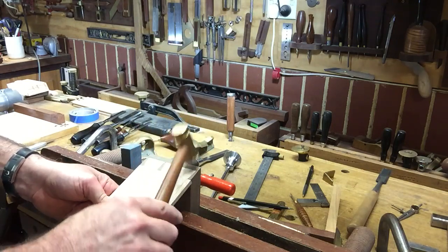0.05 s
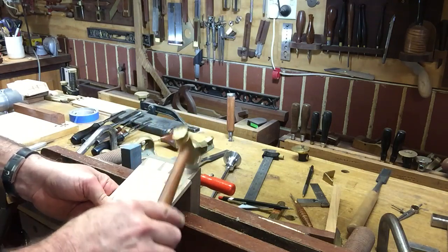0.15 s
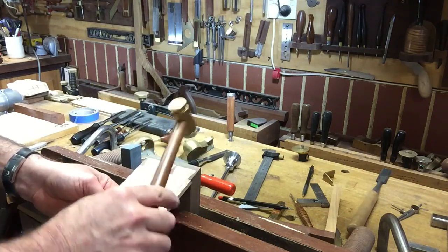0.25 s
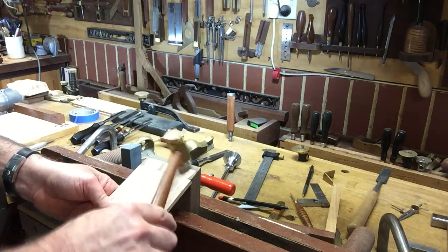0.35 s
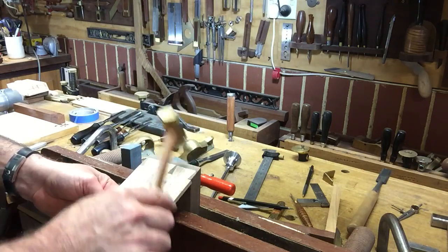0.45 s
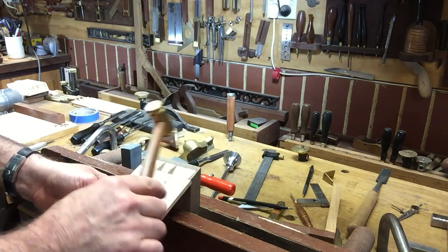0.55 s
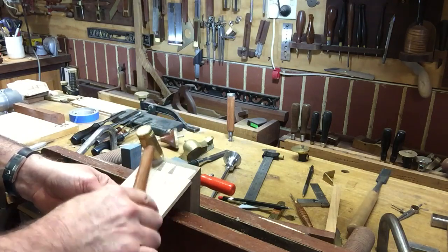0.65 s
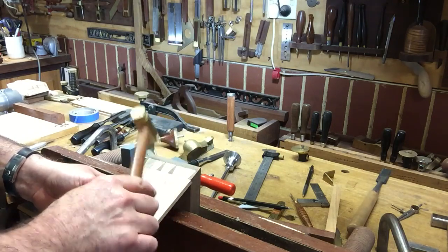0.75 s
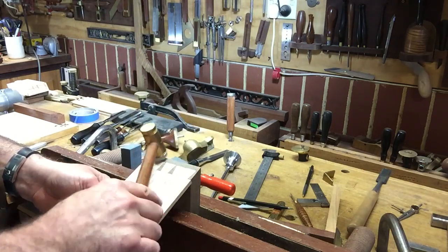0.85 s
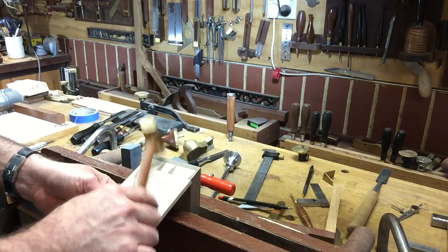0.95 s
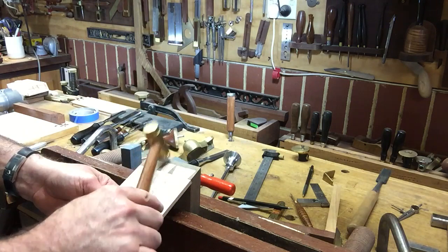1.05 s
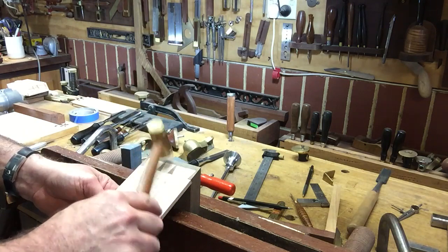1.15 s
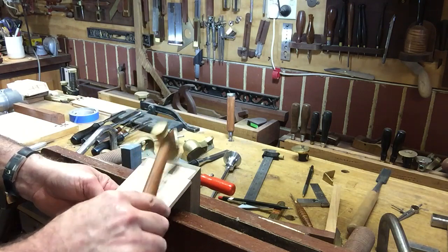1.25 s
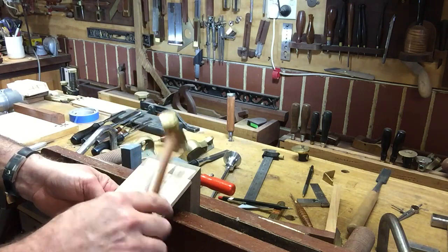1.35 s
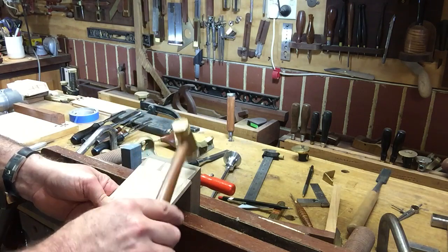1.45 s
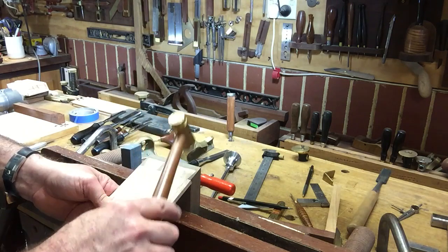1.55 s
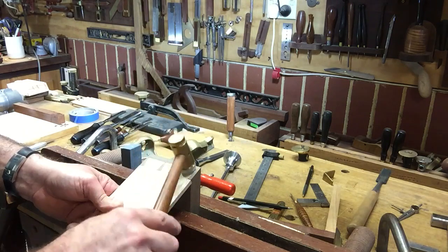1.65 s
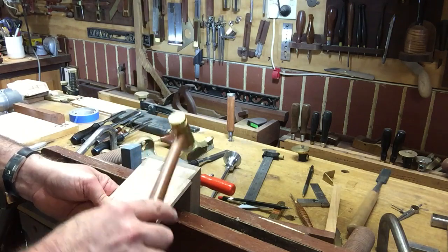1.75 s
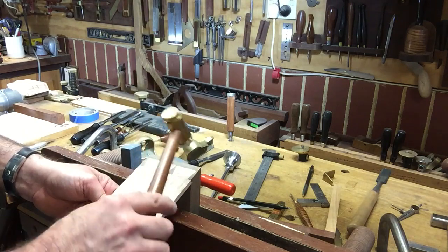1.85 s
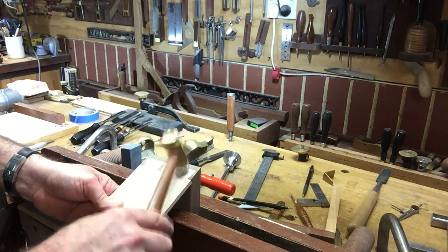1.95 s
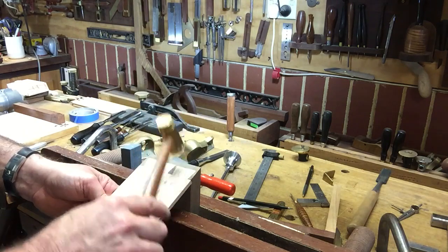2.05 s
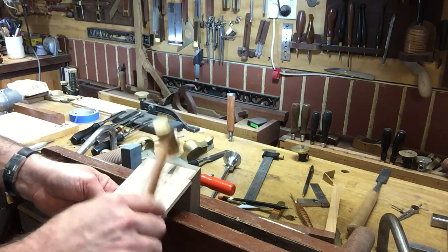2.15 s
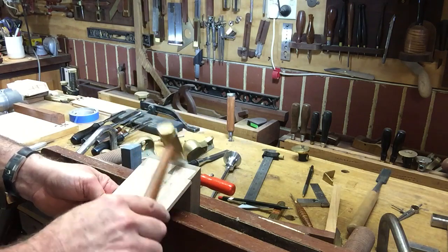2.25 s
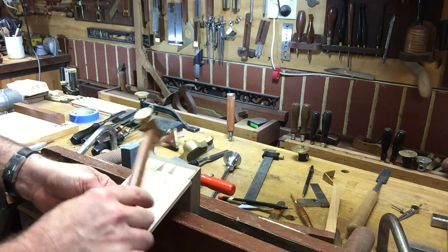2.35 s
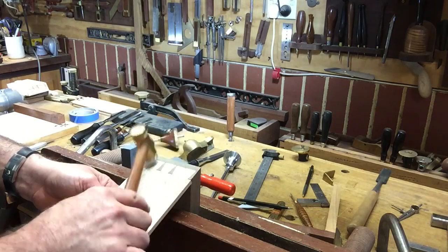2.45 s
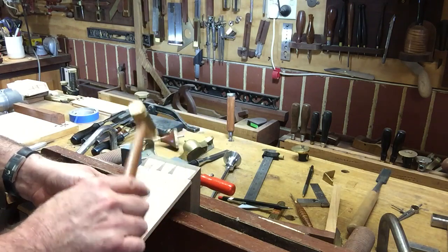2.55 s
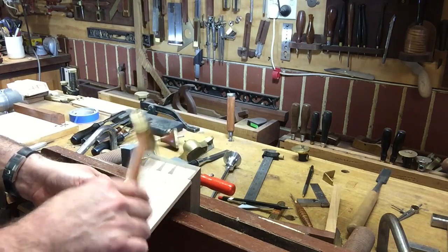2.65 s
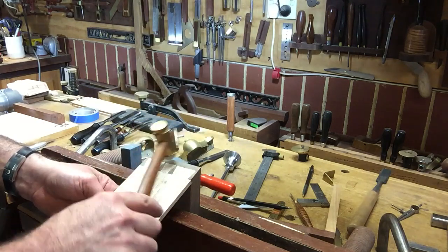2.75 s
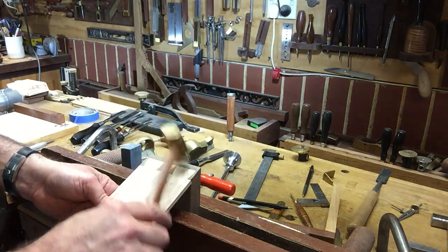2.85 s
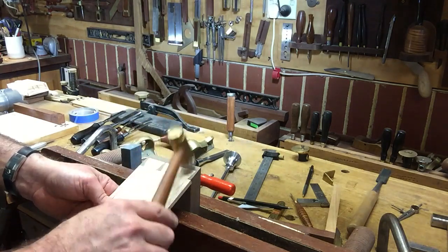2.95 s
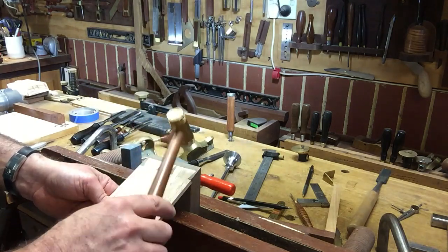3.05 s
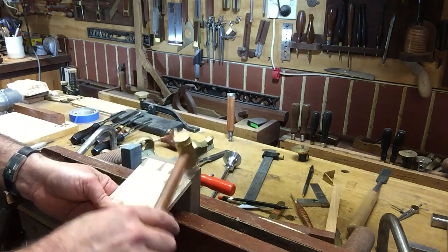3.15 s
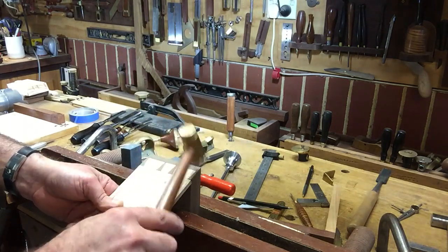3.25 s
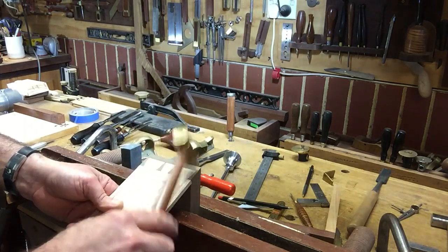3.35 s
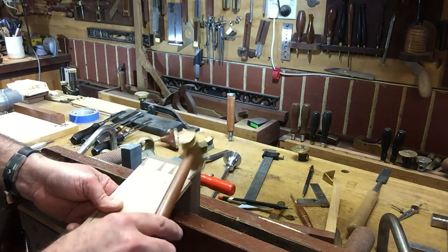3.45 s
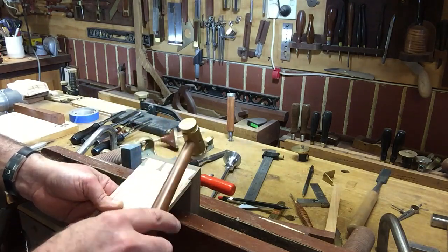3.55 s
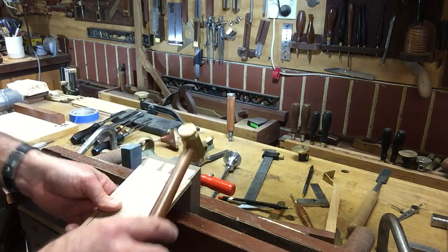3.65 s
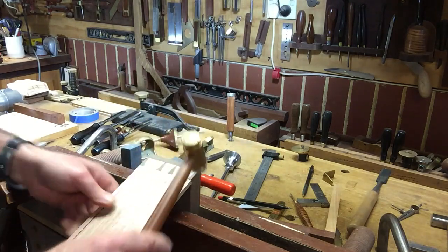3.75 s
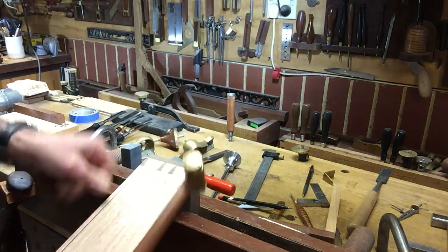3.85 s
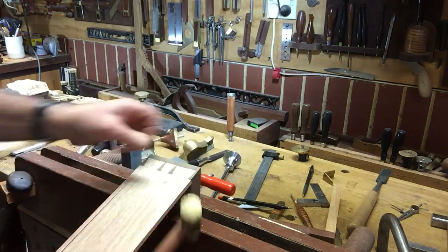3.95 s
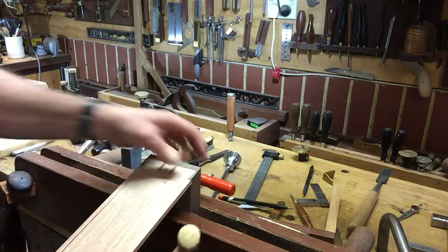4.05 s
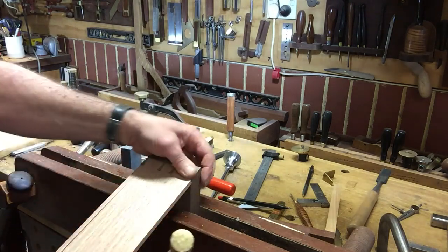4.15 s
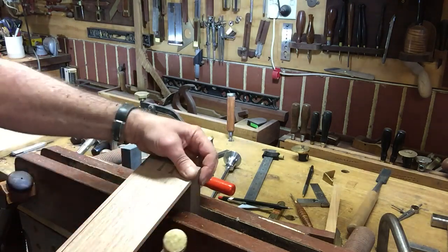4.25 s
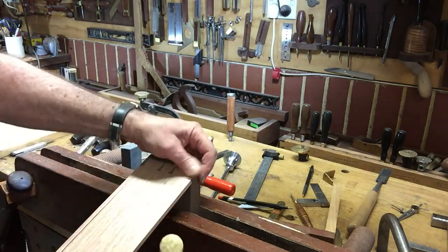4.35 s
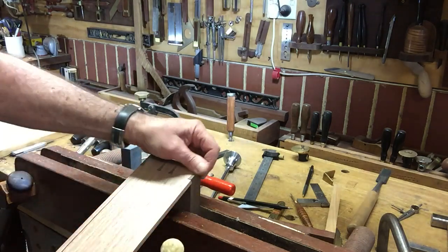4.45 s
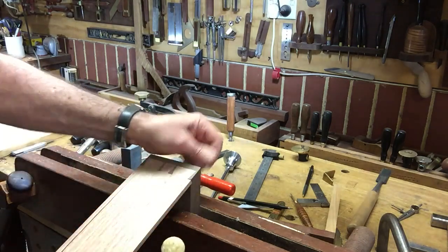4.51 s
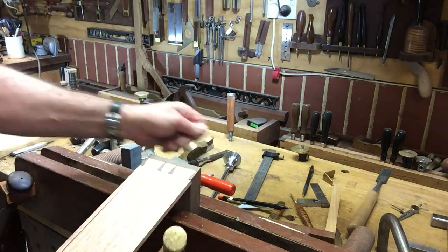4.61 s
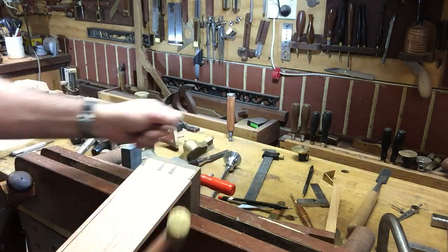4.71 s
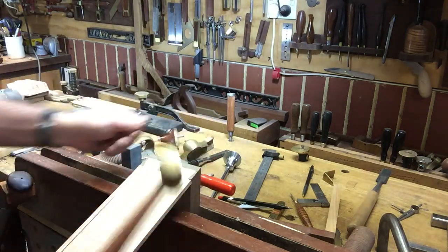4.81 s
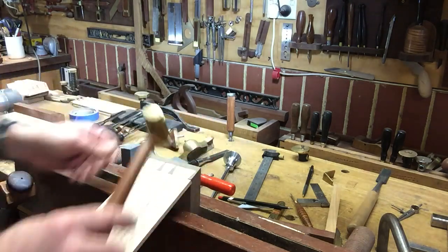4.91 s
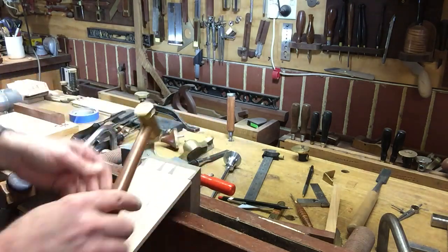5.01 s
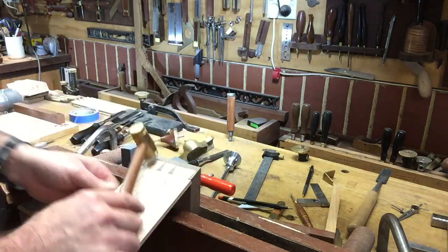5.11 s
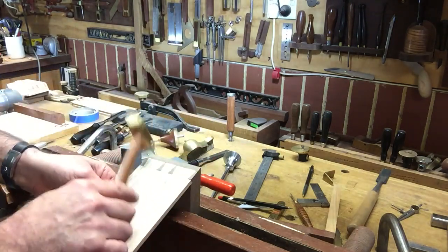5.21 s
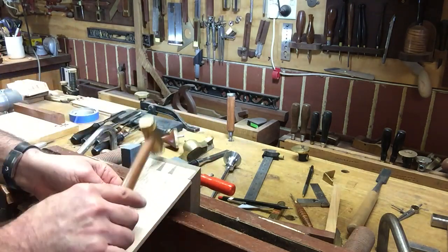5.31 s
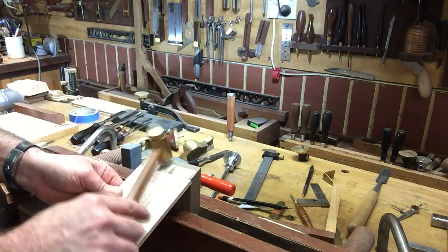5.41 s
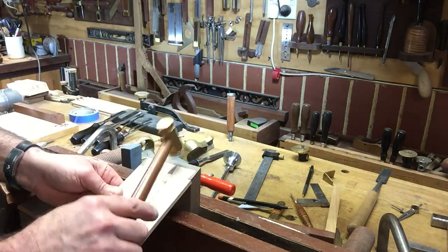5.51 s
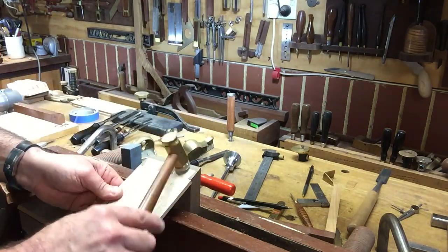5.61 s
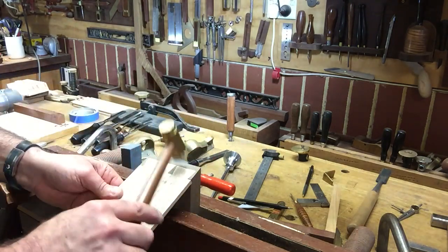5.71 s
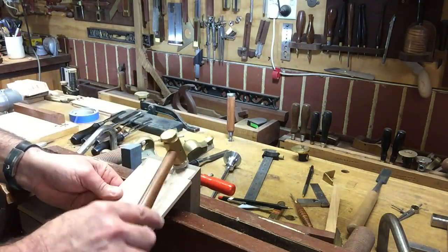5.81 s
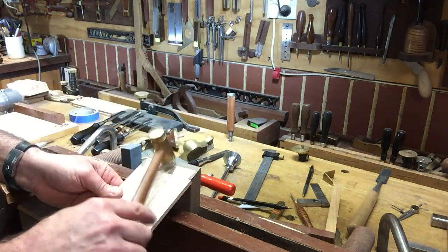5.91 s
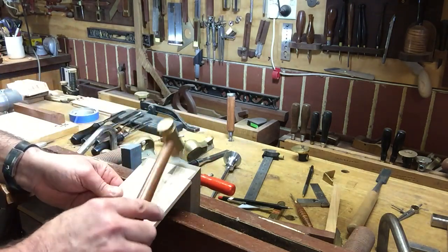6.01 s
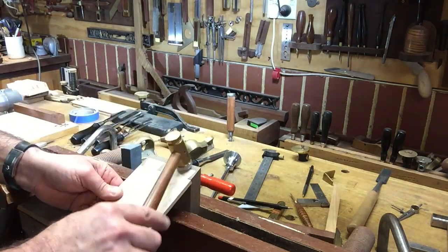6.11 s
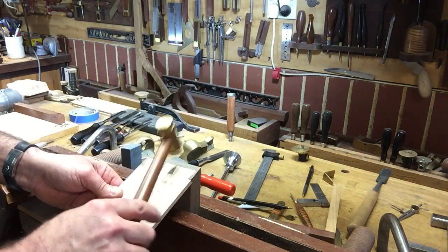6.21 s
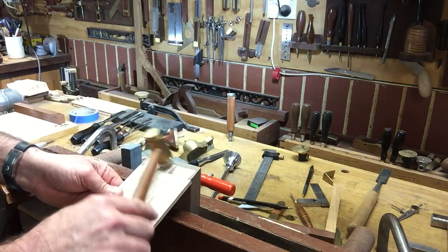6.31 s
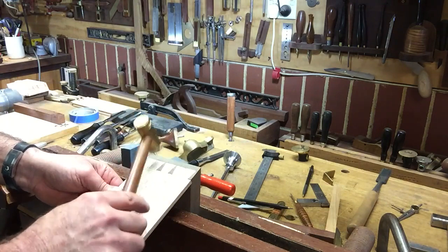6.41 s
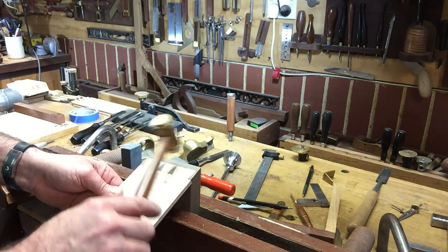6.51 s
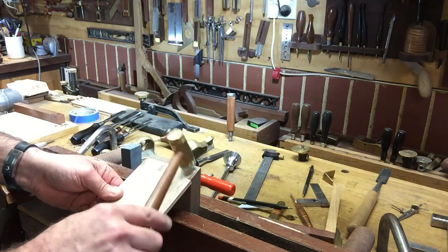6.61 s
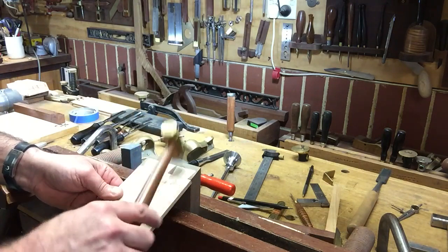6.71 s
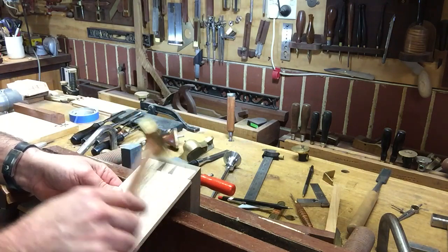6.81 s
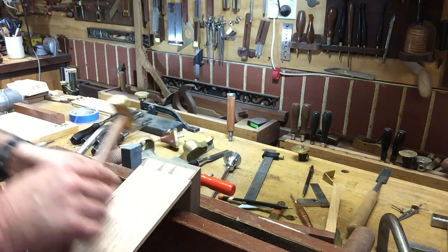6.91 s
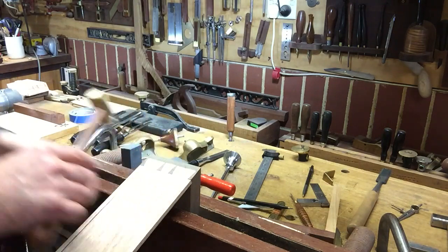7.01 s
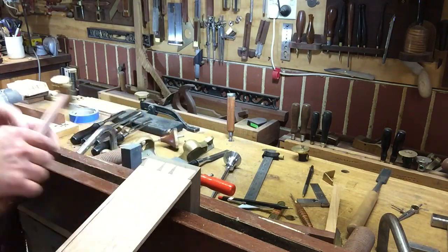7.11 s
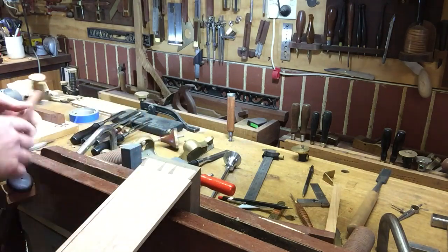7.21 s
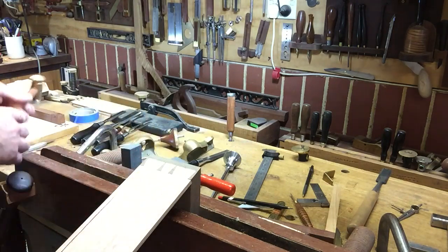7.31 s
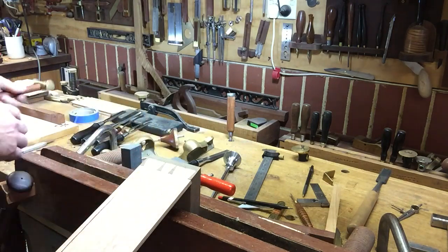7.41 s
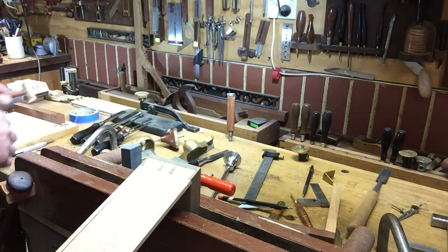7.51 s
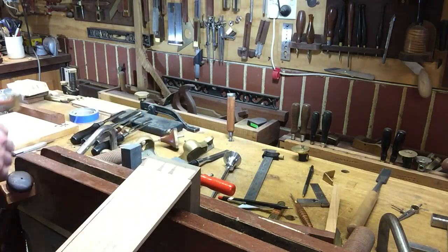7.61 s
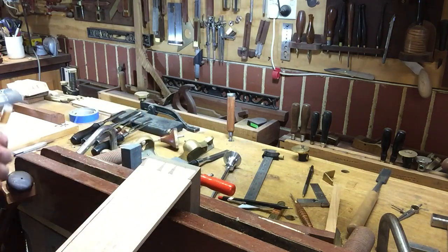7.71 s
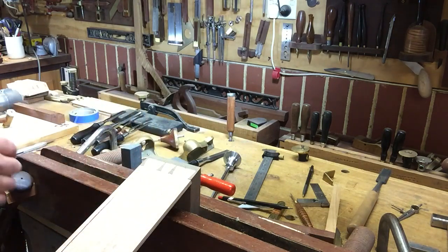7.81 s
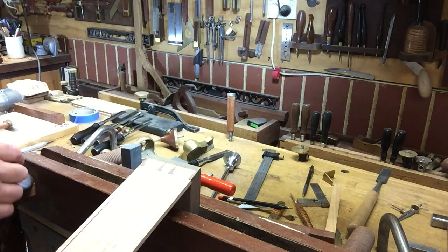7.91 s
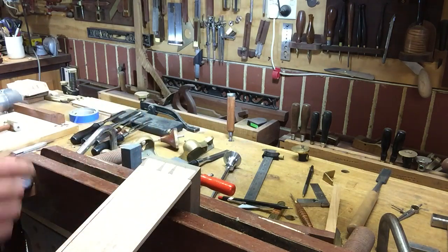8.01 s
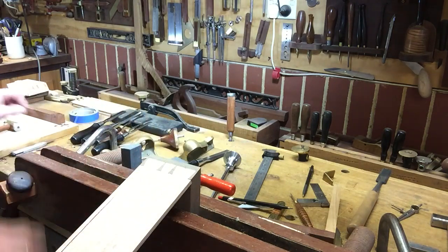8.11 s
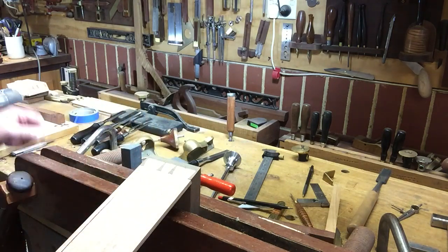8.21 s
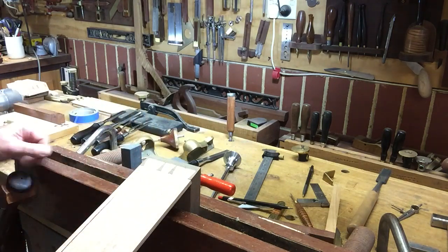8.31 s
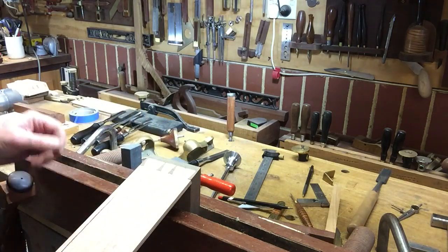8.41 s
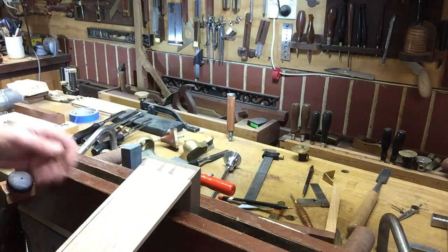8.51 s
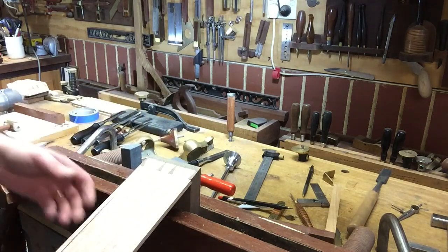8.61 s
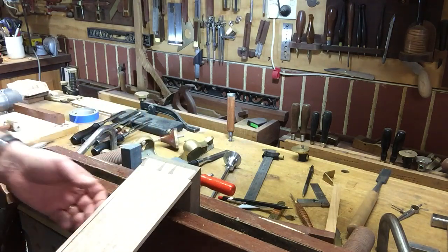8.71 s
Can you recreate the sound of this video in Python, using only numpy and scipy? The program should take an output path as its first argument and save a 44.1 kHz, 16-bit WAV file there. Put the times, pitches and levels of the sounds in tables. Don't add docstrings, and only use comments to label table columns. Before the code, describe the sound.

A small brass mallet raps quickly on a hollow wooden box joint, pauses, raps again, then is set down with a clatter in a quiet workshop.

```python
import sys
import numpy as np
from scipy import signal
from scipy.fft import rfft, irfft
from scipy.io import wavfile
from scipy.ndimage import uniform_filter1d

SR = 44100
rng = np.random.default_rng(int(sys.argv[2]) if len(sys.argv) > 2 else 0)


def convert_level_to_amplitude(level_db):
    exponent = np.asarray(level_db, float) / 20
    return 10 ** exponent


def store_pcm(level_fs):
    pcm = np.round(np.clip(level_fs, -1, 1) * 32767).astype(np.int16)
    wavfile.write(sys.argv[1], SR, np.atleast_2d(pcm).T)


N = 386316
LEAD = SR // 5

# freq_hz, density_db_per_hz
AIR_HISS = [(15, -37), (25, -17), (92, -5.5), (135, -7.5), (288, -10.5), (421, -19), (1120, -14),
            (1470, -20.5), (6700, -29), (15100, -39), (16400, -49.5)]
# start_s, peak_db, edge_knock_db, hard_tick_db (last two re peak)
MALLET_TAPS = [(0.09, -3, -9.5, -27), (0.253, -8, -5.5, -30), (0.495, -2, -10, -24.5),
               (0.538, -15.5, -18.5, -46.5), (0.771, -2.5, -4.5, -20), (0.971, -3.5, -5, -28.5),
               (1.136, -3, -7, -24), (1.309, -5, -8, -24), (1.526, -4, -4, -21.5), (1.774, -2, -5, -19.5),
               (2.086, -2, -5, -20.5), (2.341, -3, -13, -14.5), (2.586, -7, -6.5, -23), (2.8, -3, -6, -22),
               (3.038, -2.5, -7.5, -30.5), (3.28, -3, -6.5, -27.5), (3.531, -3, -8.5, -25),
               (5.213, -2.5, -1.5, -20), (5.411, -4.5, -2, -28.5), (5.578, -2.5, -10.5, -23.5),
               (5.746, -2.5, -5.5, -30), (5.918, -1, -14, -29.5), (6.081, -2, -14.5, -25.5),
               (6.244, -0.7, -12.5, -29.5), (6.419, -1, -14, -25.5), (6.585, -5.5, -4, -20),
               (6.75, -4, -6.5, -27.5), (6.906, -2.5, -14, -30)]
# peak_db, edge_knock_db, hard_tick_db
EARLIER_BLOW = (1.9, -11, -18.5)
ZONES_HZ = [100, 550, 800, 1250, 2300, 5000, 10500]
# freq_hz, level_db, t60_s, first_swing (1 out, -1 in)
BOX_MODES = [(114, -9, .115, -1), (273, 0, .063, -1), (308, -2, .025, 1), (884, -13, .08, -1),
             (944, -17, .16, -1), (961, -10, .133, -1), (1023, -10, .063, -1), (1072, -6, .065, 1),
             (1139, -17, .083, -1), (1183, -22, .13, 1)]
# freq_hz, level_db, t60_s
BOARD_MODES = [(195, -12.5, 0.25), (421, -13, 0.077), (466, -14.5, 0.22), (521.1, -15.5, 0.19),
               (625.5, -16.5, 0.08), (709.6, -30.5, 0.27), (810, -36, 0.11), (1255, -21.5, 0.18),
               (1467, 0, 0.01), (1679, -10, 0.029), (1790, -22, 0.081), (1930, -10, 0.038),
               (2392, -23.5, 0.019), (2891, -16.5, 0.042), (3080, -18.5, .03), (3320, -25.5, 0.029),
               (4250, -12, 0.03)]
# freq_hz, t60_s, level_db
SHOP_BANDS = [(79.5, 0.25, -0.5), (167, 0.7, 10), (342, 0.49, 7), (588, 0.56, 2), (1100, 0.47, -10.5),
              (1790, 0.42, -3.5), (3278, 0.52, -3.5), (6480, 0.42, 1), (10600, 0.14, -1), (15650, 0.22, -2)]
# land_s, slide_s, level_db, dull_share_db
BRUSH_STROKES = [(.47, .015, -61, -2), (3.81, 0.059, -63.5, -5), (3.88, 0.042, -57, -2),
                 (4.285, .02, -53.5, -23), (4.496, .045, -56, -11.5), (4.625, 0.0099, -56, -1),
                 (4.99, 0.073, -65, 0), (5.198, .014, -57.5, 4), (7.37, .006, -69, 13.5),
                 (7.635, 0.021, -75, 9), (7.77, 0.038, -61.5, 5.5), (7.86, .012, -71.5, 9),
                 (8.409, 0.0082, -60, 6), (8.455, .012, -62.5, -12)]
# freq_hz, density_db_per_hz
SKIN_HISS = [(1180, -21), (2000, -10.5), (3460, -0.5), (3910, -11.5), (4410, -1.5), (5030, -9.5),
             (6530, -8), (13900, -11), (16000, -35)]
# start_s, peak_db, thump_db, knock_db, snap_db
SHELF_KNOCKS = [
    (7.37, -64, -15, -4.5, 7),
    (7.874, -25, -6.5, -0.5, -18.5),
    (7.887, -25.5, -40, -1.1, -30),
    (7.897, -15.5, -32, -5, -29.5),
    (8.032, -15, -15, -7, -23),
    (8.098, -19.5, -20.5, 4, -6.5),
    (8.395, -43, -10.5, -14, -12),
]
# freq_hz, level_db, t60_s
SHELF_MODES = [(127, -1.5, 0.25), (214, -12, 0.091), (330.5, -1, 0.28), (399.4, -0.5, 0.16),
               (503, 11.5, 0.031), (710, -6.5, 0.15), (845, -5, 0.034), (934, -4, 0.034),
               (1074, 0.5, 0.023), (1206, 2.5, 0.019), (1414, -5.5, 0.038), (1710, -8.5, 0.032),
               (1880, -24, 0.0067), (2380, -6.5, 0.0069)]
# low_hz, high_hz, attack_db, tail_db
SMEAR_BANDS = [(4570, 7000, -4, -32.5), (7190, 20000, -4.5, -36), (8600, 17000, -2, -18),
               (11900, 13000, -4.5, -23)]


def level(x, db):
    return x * convert_level_to_amplitude(db) / np.sqrt(np.mean(x ** 2))


def colour(x, points):
    hz, db = np.transpose(points)
    f = np.maximum(np.arange(len(x) // 2 + 1) * SR / len(x), 1)
    gain_db = np.interp(np.log(f), np.log(hz), db)
    return irfft(rfft(x) * convert_level_to_amplitude(gain_db), len(x))


def fade(t, t60_s):
    return np.exp(-np.log(1000) * t / t60_s)


def walk(rate_hz):
    k = int(SR / rate_hz)
    steps = np.repeat(rng.standard_normal(N // k + 1), k)
    return 1.6 * uniform_filter1d(uniform_filter1d(steps, k), k)[:N]


def air():
    fading_db = -64 - 3.5 * np.maximum(np.arange(N) / SR - 3.5, 0)
    drone_hz_db = [(40, -28), (70, -24.5), (82, 1.5), (96, -18.5), (200, -47.5)]
    drone = level(colour(rng.standard_normal(N), drone_hz_db), 0.1)
    hiss_hz_db = [(max(hz, 25), db) for hz, db in AIR_HISS]
    hiss = level(colour(rng.standard_normal(N), hiss_hz_db), -60.5)
    return drone * convert_level_to_amplitude(fading_db + 1.0 * walk(4.3)) + hiss * convert_level_to_amplitude(-4.5 + 0.66 * walk(1.7))


def blows(events, modes, ring_db, crack_db, crack_s, swell_s, scatter_db, detune, click_db, wobble):
    rise_s, contact_s, bench_echo_s, bench_echo_db = .0012, .0001, .0053, -10
    out = np.zeros((4, N + LEAD + SR))
    t = np.arange(SR // 5) / SR
    t_crack = t[:2048]
    hz, db, t60_s, swing = np.transpose(modes)[:, :, None]
    t60_s = np.minimum(t60_s, np.minimum(.2, 100 / hz + .05 * (hz < 1300)))
    fickle = np.clip(hz / 1000 - 1.2, wobble, 1)
    luck = rng.standard_normal((len(events), 2, len(modes), 1)) * fickle
    grit = rng.standard_normal((len(events), 2048))
    aim = rng.standard_normal((len(events), 3, 1)) * [[0], [.35], [.35]] + [[1], [0], [0]]
    grow = 1 - np.exp(-t * hz / 1000 / swell_s)
    crack_shape = np.exp(-t_crack / crack_s) * (1 - np.exp(-t_crack / contact_s))
    for event, (size, pitch), noise, way in zip(events, luck, grit, aim):
        start_s, peak_db, thump_db, knock_db, snap_db, tick_db = event
        zones_db = [thump_db, thump_db, 0, 0, knock_db, snap_db, tick_db]
        zone_db = np.interp(np.log(hz), np.log(ZONES_HZ), zones_db)
        gain = swing * convert_level_to_amplitude(db + scatter_db * size + zone_db)
        swings = np.sin(2 * np.pi * hz * (1 + detune * pitch) * t)
        near = convert_level_to_amplitude(ring_db) * np.sum(gain * grow * fade(t, t60_s) * swings, axis=0)
        far = near * fade(t, 0.034)
        treble = [(1200, -19.0)] + list(zip(ZONES_HZ[4:], zones_db[4:])) + [(16000, tick_db - 4)]
        far[:2048] += convert_level_to_amplitude(click_db) * colour(signal.unit_impulse(2048, 32), treble)
        crack = convert_level_to_amplitude(crack_db) * colour(noise, treble) * crack_shape
        bench_echo = np.roll(crack, int(bench_echo_s * SR)) * (t_crack > bench_echo_s)
        near[:2048] += crack + convert_level_to_amplitude(bench_echo_db) * bench_echo
        at = int((start_s + rise_s) * SR) + LEAD
        out[:, at:at + len(t)] += convert_level_to_amplitude(peak_db) * np.vstack([near, way * far])
    return out[:, :N + LEAD]


def mallet_taps():
    modes = list(BOX_MODES) + [(*mode, 1) for mode in BOARD_MODES]
    events = []
    for start_s, peak_db, edge_db, hard_db in [(-.075, *EARLIER_BLOW)] + list(MALLET_TAPS):
        thump_db = -15.5 - .9 * peak_db
        snap_db = 6.5 + 0.43 * edge_db + 0.83 * hard_db
        events.append((start_s, peak_db, thump_db, edge_db, snap_db, hard_db))
    return blows(events, modes, ring_db=5.0, crack_db=18.5, crack_s=0.0014, swell_s=.0009,
                 scatter_db=5, detune=0.032, click_db=26.5, wobble=.05)


def shop(x):
    t = np.arange(int(.7 * SR)) / SR
    noise, echo = rng.standard_normal(len(t)), 0
    centres_hz = [hz for hz, _, _ in SHOP_BANDS]
    for hz, t60_s, db in SHOP_BANDS:
        band = colour(noise, [(c, -14 * np.log2(c / hz) ** 2) for c in centres_hz])
        build = np.clip((t - .004) / (0.0042 + 0.0047 * (hz < 1500)), 0, 1)
        far_walls, near_shelves = fade(t, t60_s), 1.5 * fade(t, 0.21 * t60_s)
        echo = echo + convert_level_to_amplitude(db) * band * (far_walls + near_shelves) * build
    return signal.fftconvolve(x, echo / np.sqrt(np.sum(echo ** 2)))[:len(x)]


def brushes():
    land_db_per_s, lift_db_per_s = 901, 504
    t, bright, dull = np.arange(N) / SR, 0, 0
    for land_s, slide_s, db, dull_db in BRUSH_STROKES:
        landing_db = land_db_per_s * np.maximum(land_s - t, 0)
        lifting_db = lift_db_per_s * np.maximum(t - land_s - slide_s, 0)
        touch = convert_level_to_amplitude(db - landing_db - lifting_db)
        bright = bright + touch
        dull = dull + touch * convert_level_to_amplitude(dull_db)
    grain = convert_level_to_amplitude(1.5 * walk(300))
    hiss = level(colour(rng.standard_normal(N) * grain, SKIN_HISS), 0.1)
    rub_hz_db = [(500, -40.0), (1000, 1.0), (1400, -10.5), (2000, 5.0), (2600, -0.5), (3500, -34.0)]
    rub = level(colour(rng.standard_normal(N) * grain, rub_hz_db), 0.1)
    return bright * hiss + dull * rub


def mallet_laid_down():
    events = [(*row, -26.5 + row[-1]) for row in SHELF_KNOCKS]
    modes = [(*mode, 1) for mode in SHELF_MODES]
    return blows(events, modes, ring_db=7.5, crack_db=11, crack_s=0.0045, swell_s=0.0012,
                 scatter_db=3.0, detune=0.049, click_db=26.5, wobble=.6)


def scene():
    taps, knocks = mallet_taps(), mallet_laid_down()
    echo = sum(shop(way) for way in convert_level_to_amplitude(-3) * taps[1:] + convert_level_to_amplitude(5) * knocks[1:])
    struck = (taps[0] + knocks[0] + echo)[LEAD:]
    return np.tile(struck + brushes() + air(), (2, 1))


def low_pass(x):
    return signal.sosfilt(signal.butter(12, 16570, fs=SR, output="sos"), x)


def record(dry):
    mid = 0.93 * np.tanh(dry[0] / 1.037)
    mid = signal.sosfilt(signal.ellip(8, .2, 60, 15800, fs=SR, output="sos"), mid)
    mid = signal.sosfilt(signal.butter(1, 28, "highpass", fs=SR, output="sos"), mid)
    smear = 0
    for low_hz, high_hz, attack_db, tail_db in SMEAR_BANDS:
        band = signal.butter(6, [low_hz, high_hz], "bandpass", fs=SR, output="sos")
        power = signal.sosfiltfilt(band, mid) ** 2
        now = np.abs(uniform_filter1d(power, int(.005 * SR)))
        around = uniform_filter1d(power, SR // 20) + 1e-12
        sudden = np.clip(now / around / 3 - .7, 0, 1)
        noise = signal.sosfilt(band, rng.standard_normal((2, N)))
        noise = noise * np.sqrt(SR / 2 / (high_hz - low_hz))
        smear = smear + noise * np.sqrt(now) * (convert_level_to_amplitude(attack_db) * sudden + convert_level_to_amplitude(tail_db))
    return low_pass(mid + smear)


dry = scene()
out = record(dry)
store_pcm(out)
```